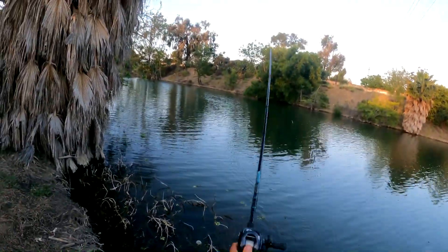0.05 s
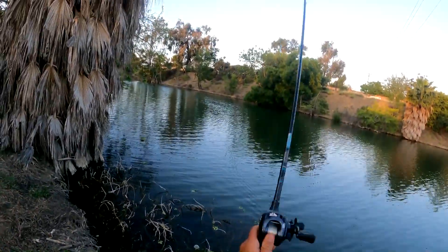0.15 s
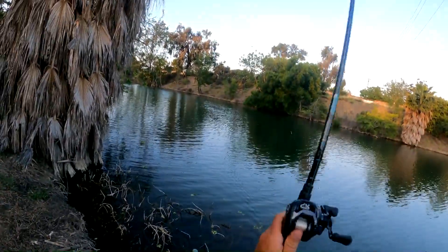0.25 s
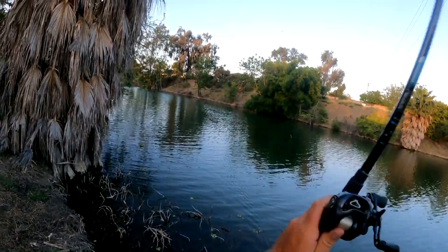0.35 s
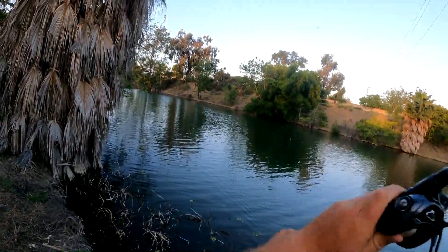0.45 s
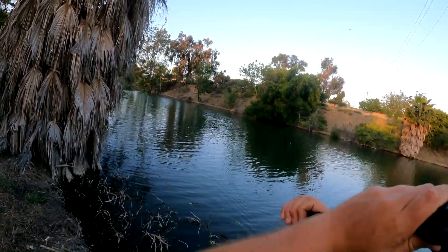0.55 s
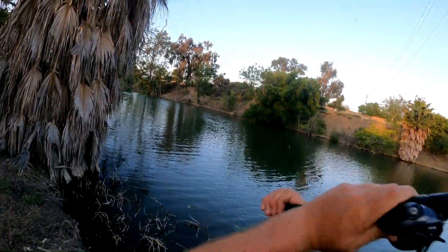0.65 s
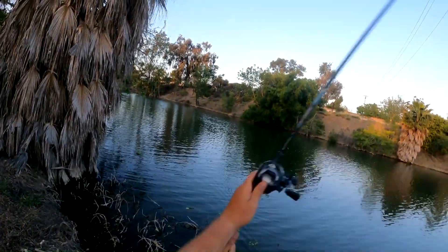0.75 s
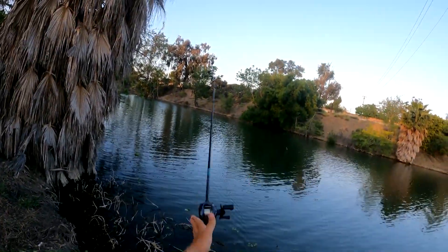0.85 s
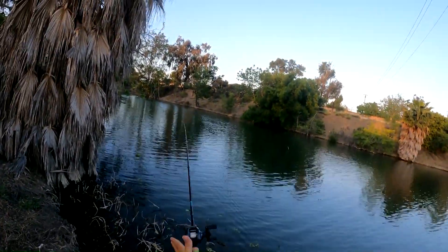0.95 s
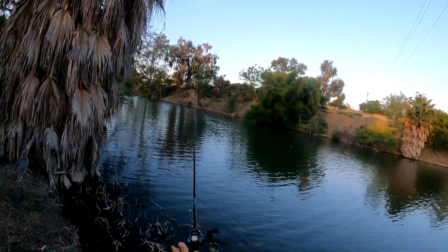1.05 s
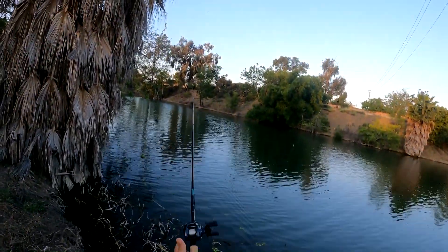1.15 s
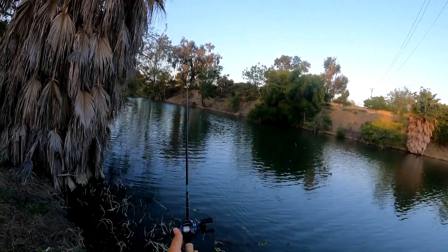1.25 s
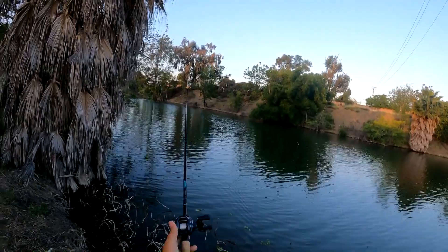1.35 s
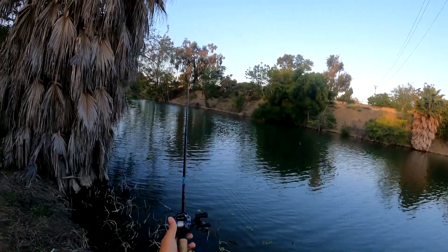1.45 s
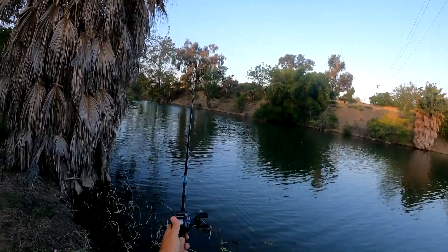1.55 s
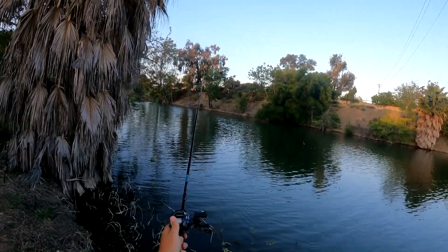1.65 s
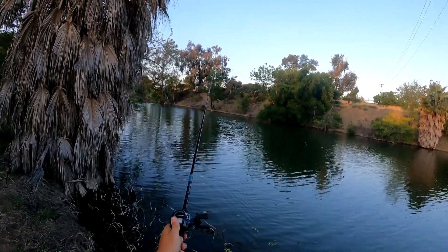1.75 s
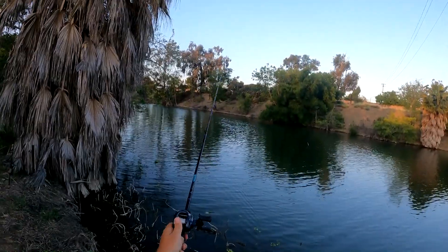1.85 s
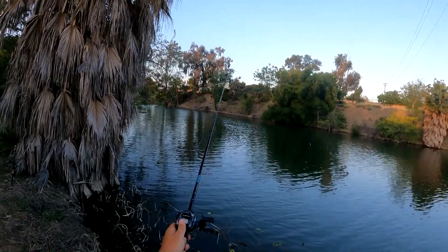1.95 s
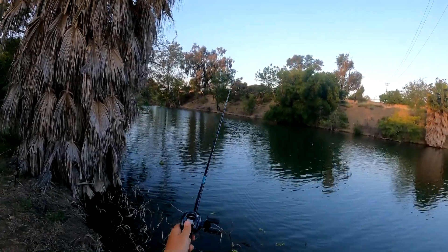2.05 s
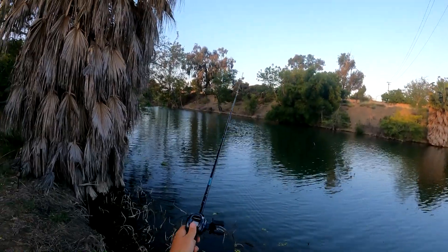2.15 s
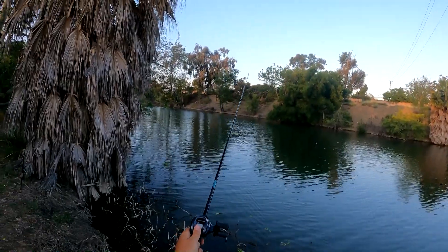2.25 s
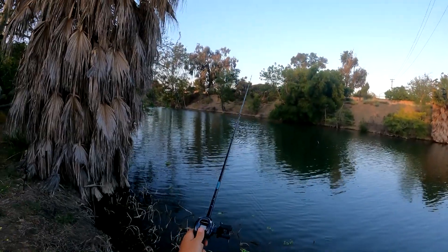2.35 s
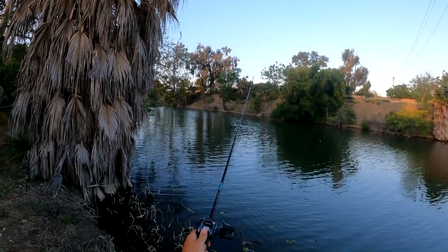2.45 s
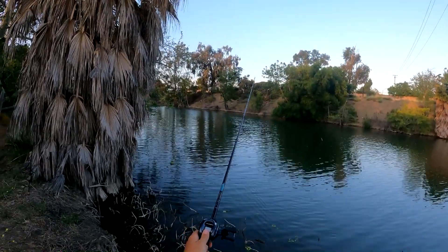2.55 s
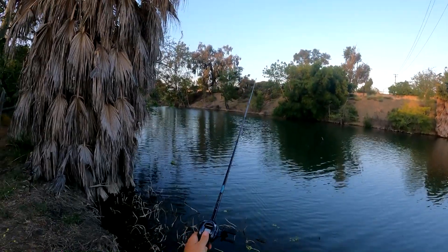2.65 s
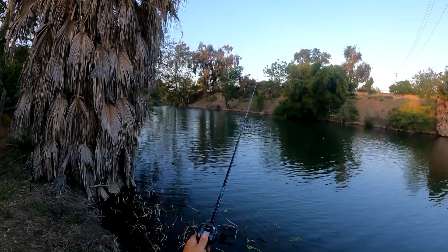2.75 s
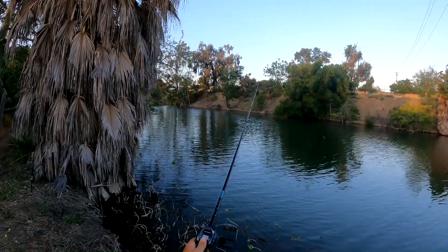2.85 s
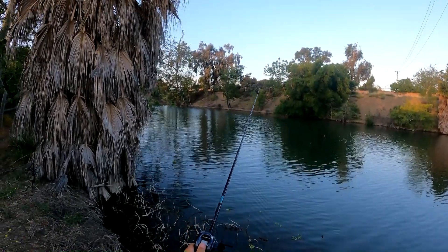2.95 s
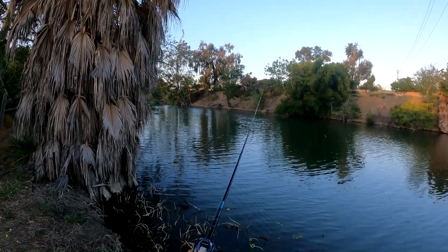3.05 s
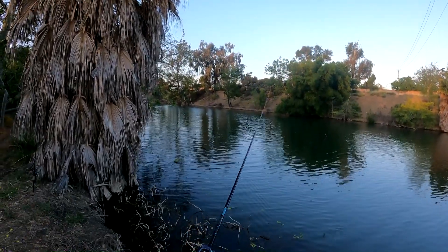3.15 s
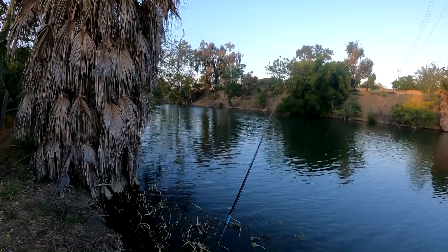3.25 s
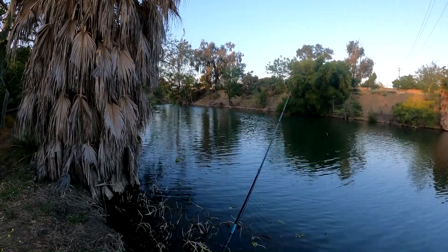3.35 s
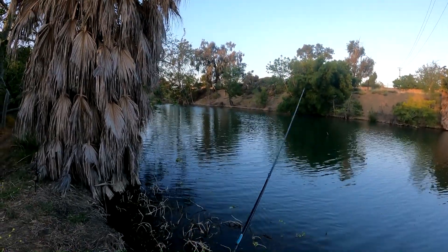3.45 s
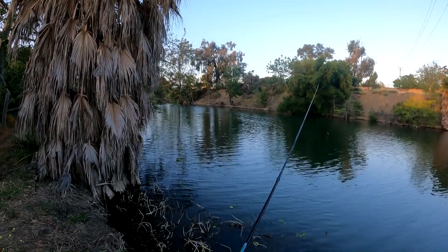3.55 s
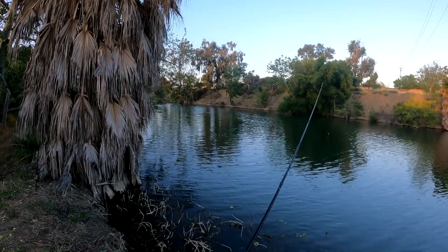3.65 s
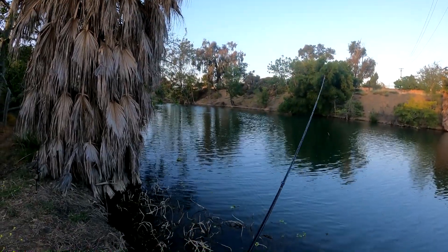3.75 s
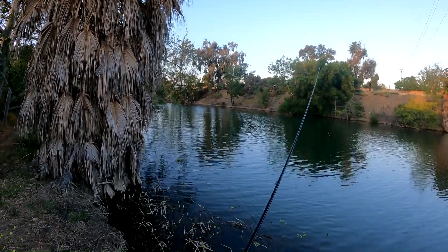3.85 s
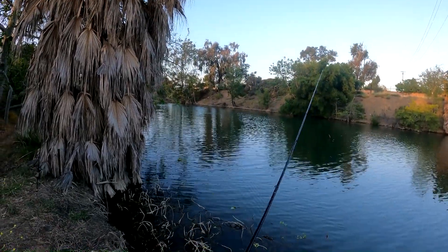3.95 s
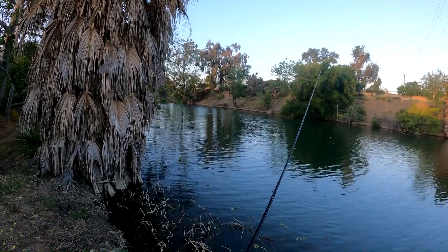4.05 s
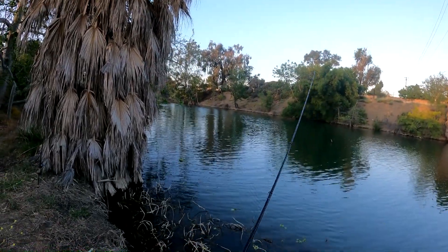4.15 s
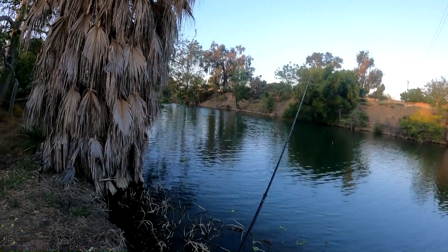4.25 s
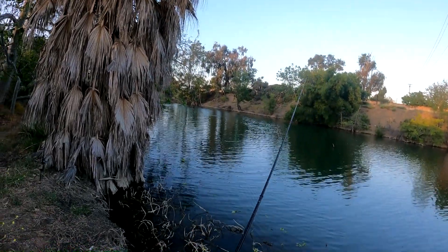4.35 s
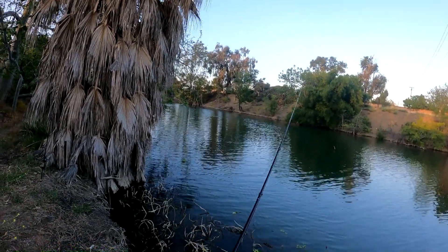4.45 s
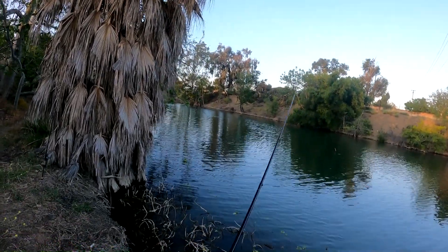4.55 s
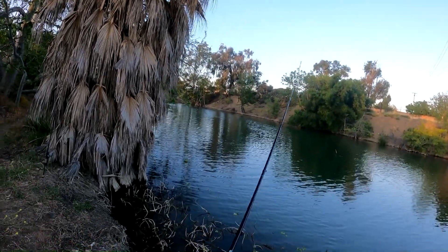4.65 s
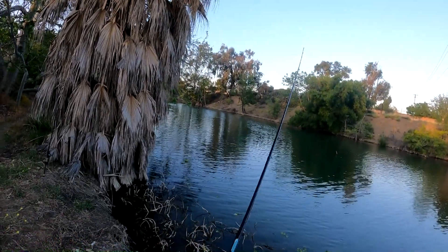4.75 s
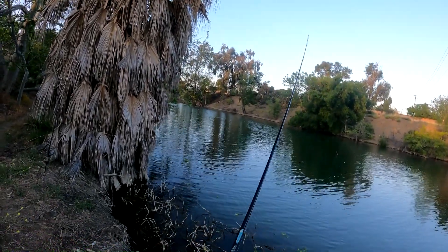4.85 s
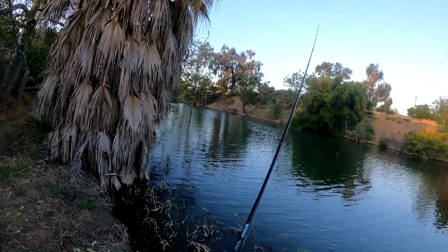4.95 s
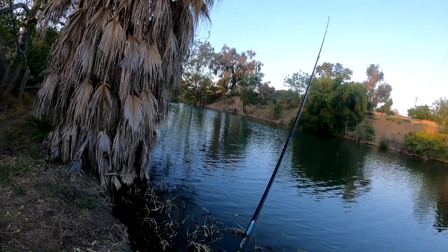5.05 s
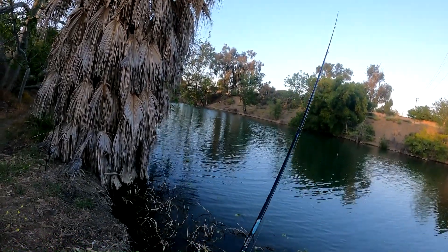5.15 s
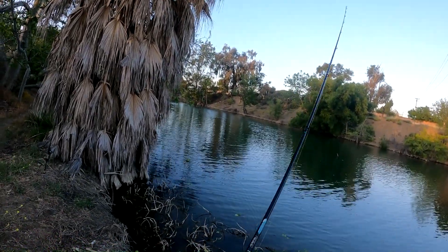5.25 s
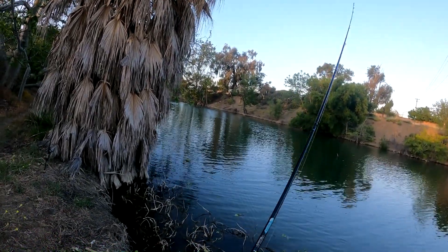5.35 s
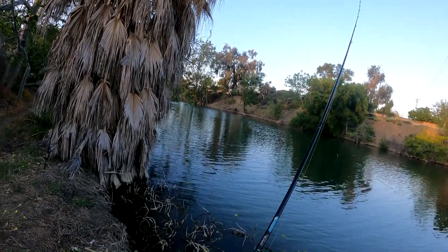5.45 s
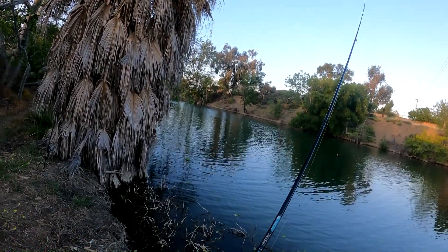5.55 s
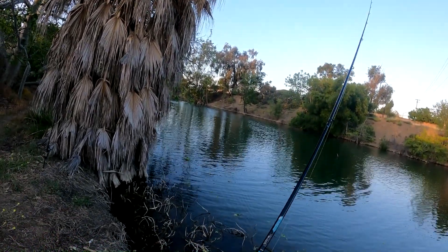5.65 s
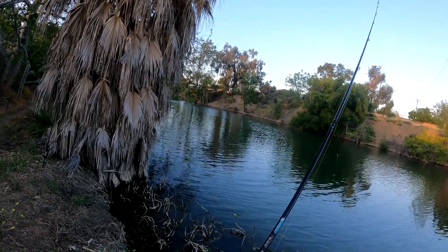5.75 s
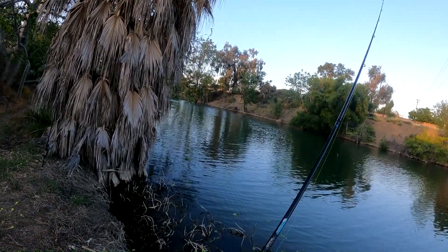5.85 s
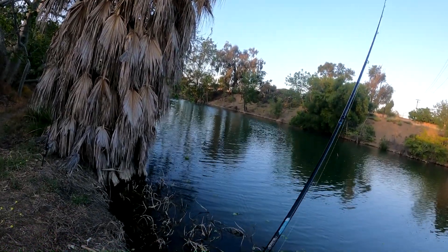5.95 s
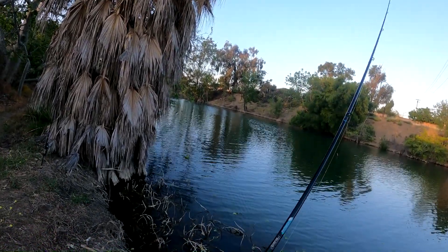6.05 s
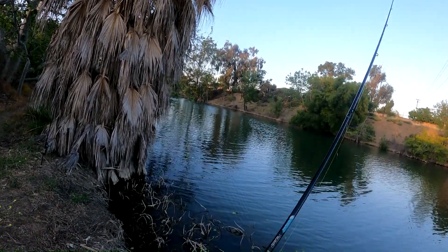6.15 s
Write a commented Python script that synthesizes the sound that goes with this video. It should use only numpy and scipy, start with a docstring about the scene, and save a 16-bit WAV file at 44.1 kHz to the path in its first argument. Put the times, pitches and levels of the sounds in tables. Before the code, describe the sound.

A fishing rod is cast with a swish and a falling reel whir, then one sharp click, over steady wind rumble and distant traffic.

```python
"""At a pond, over a steady rumble of wind and far traffic, a baitcasting rod is cast close by.
The rod swishes and knocks. The spool whirs down in pitch as line hisses through the guides,
then loose coils flutter against the reel until it stops. A turn of the handle snaps the reel
back into gear with one sharp click, and slack line is wound in with faint ticks."""
import sys
import numpy as np
from scipy import signal
from scipy.fft import rfft, irfft, next_fast_len
from scipy.io import wavfile

SR = 44100
rng = np.random.default_rng(int(sys.argv[2]) if len(sys.argv) > 2 else 0)


def file_out(sig):
    """Save sig as 16-bit WAV at sys.argv[1]."""
    # one column per channel
    cols = np.atleast_2d(sig).T
    # limit, then scale
    lim = np.clip(cols, -1, 1)
    pcm = np.round(lim * 32767).astype(np.int16)
    wavfile.write(sys.argv[1], SR, pcm)


N = 273023
TIME = np.arange(N) / SR
RELEASE_S, SLOWS_S, STOP_S = 0.8195, 1.715, 2.39  # the lure leaves, the lure slows, the spool stops

# Whir of the braked spool, sinking and faltering once:
# (time [s], pitch [Hz], fundamental trim [dB], overtone trim [dB], speed jitter [fraction])
WHIR_CURVE = [(.88, 1493, 1, -16, 0.03), (.98, 1442, -3.5, -8, .024), (1.07, 1344, 1, -6, .028),
              (1.15, 1279, 0, -2, 0.047), (1.24, 1285, -1, 2.5, 0.031), (1.285, 1246, 1, 1.5, .028),
              (1.32, 1160, -16, -1.5, 0.031), (1.37, 1106, 0, 1, 0.029), (1.53, 1070, -3.5, 1, .03),
              (1.6, 1026, -2.5, 1.5, .048), (1.69, 955, 0.5, -0.5, .045), (1.75, 931, -6, -4, .05)]
# Its harmonics, lowest first: (base level at release [dB], growth [dB/s], jitter scale [factor])
WHIR_PARTIALS = [(-42, -9, .85), (-46, 2, 1.1), (-59, 7, 1.1), (-52, 3, 1.05)]
# Side plate resonances that lift a passing partial: (centre [Hz], width [Hz], boost [dB])
SIDE_PLATE = [(2920, 400, 8), (4410, 1040, 9.5)]


def spool_whir(spin_up_s=.08, jitter_hz=330, rasp_depth=0.23, rasp_hz=380, waver_hz=35, plate_db=-45):
    """The spool's rough whir sinks until the lure slows; its top partial sets the side plate rasping."""
    pitch, fundamental_db, overtone_db, jitter = in_time(WHIR_CURVE)
    pitch = pitch * (1 + .009 * drift(waver_hz))
    flown_s = np.minimum(TIME, SLOWS_S) - RELEASE_S
    whir = 0
    for k, (db, growth, jitter_scale) in enumerate(WHIR_PARTIALS, 1):
        # coils peel off unevenly: the pitch jitters, smearing the high partials most, and the level rasps
        partial_hz = k * pitch * (1 + jitter_scale * jitter * drift(jitter_hz))
        phase = 2 * np.pi * np.cumsum(partial_hz) / SR
        tone = rms_one(np.sin(phase) * (1 + rasp_depth * drift(rasp_hz)))
        level_db = db + growth * flown_s + (fundamental_db if k == 1 else overtone_db)
        boost_db = sum(boost * nearness(k * pitch, hz, width) for hz, width, boost in SIDE_PLATE)
        waver_db = 1.8 * drift(waver_hz)
        whir += from_db(level_db + boost_db + waver_db) * tone
    plate_hz, plate_width, _ = SIDE_PLATE[-1]
    drive = nearness(len(WHIR_PARTIALS) * pitch, plate_hz, plate_width)
    plate = from_db(plate_db + overtone_db) * drive * narrow_tone(plate_hz, width_hz=420)
    return (whir + plate) * swell(RELEASE_S + spin_up_s, SLOWS_S, rise=600, fall=300)


# Hiss riding the pull of the line: (time [s], relative level [dB])
HISS_CURVE = [(.84, -35.5), (1.04, -38), (1.2, -35.5), (1.4, -38.5), (1.58, -38.5), (1.72, -43.5)]
# Colour of line on the guides: (frequency [Hz], relative level [dB])
HISS_SPECTRUM = [(500, -5), (800, -12.5), (1500, -3.5), (2800, 1.5), (3400, -3), (5200, 0.5), (6700, -4),
                 (8500, -5.5), (10300, -10), (12500, -15.5), (14200, -25), (15500, -41)]
# Reel frame resonances under the running line: (centre [Hz], width [Hz], strength [dB])
FRAME_RESONANCES = [(3900, 790, 0), (7520, 600, -6)]
# Two high rings over the hiss: (time [s], lower ring level [dB], upper ring level [dB])
RING_CURVE = [(.85, -44, -60), (1.08, -44, -58), (1.24, -45, -57), (1.36, -55, -55), (1.48, -51, -51),
              (1.56, -44, -57), (1.72, -56, -55)]
# Squeals in the guides: (time [s], length [s], pitch [Hz], level [dB])
LINE_SQUEALS = [(.9, .04, 4830, -46), (.98, 0.064, 3990, -41.5), (1.19, .04, 3810, -46)]


def running_line(hiss_trim_db=2):
    """Line rubs through the guides while the lure flies, ringing high and squealing briefly."""
    flight = swell(RELEASE_S, SLOWS_S, rise=400, fall=220)
    hiss_db = in_time(HISS_CURVE)[0] + hiss_trim_db
    hiss = from_db(hiss_db) * stereo_noise(HISS_SPECTRUM, FRAME_RESONANCES)
    lower_db, upper_db = in_time(RING_CURVE)
    rings = from_db(lower_db) * narrow_tone(7520, width_hz=430)
    rings += from_db(upper_db) * narrow_tone(10200, width_hz=900)
    squeals = sum(from_db(db) * bell(s, length) * narrow_tone(hz, width_hz=90)
                  for s, length, hz, db in LINE_SQUEALS)
    return flight * (hiss + rings) + squeals


# Colour of the rod's whoosh: (frequency [Hz], relative level [dB])
SWISH_SPECTRUM = [(200, -23), (550, 2.5), (900, -2), (1700, -1), (2300, -2), (3200, -11), (5000, -16),
                  (9000, -28.5), (15000, -35)]


def rod_swish(fastest_s=.828, whoosh_db=-32.5, whistle_hz=1950, whistle_db=-37, puff_db=-26):
    """The rod tears the air, whistling higher with its speed, and sends a low puff to the microphone."""
    speed = swell(fastest_s, fastest_s, rise=287, fall=211.5)
    whistle = from_db(whistle_db) * narrow_tone(whistle_hz * speed ** 0.2, width_hz=330)
    whoosh = from_db(whoosh_db) * stereo_noise(SWISH_SPECTRUM)
    puff = from_db(puff_db) * stereo_noise(WIND_SPECTRUM)
    return speed * (whoosh + whistle + puff)


# Hits in rod and reel; the loudest are the knock of the cast and the snap into gear:
# (time [s], attack level [dB], band centre [Hz], decay t60 [s])
TACKLE_HITS = [(.654, -57, 8000, 0.011), (0.6952, -50, 8000, 0.0091), (0.7015, -36, 1150, 0.0039),
               (0.728, -53, 6500, 0.011), (0.8192, -33.5, 3600, 0.009), (.8342, -20, 2700, .005),
               (3.0058, -43, 5200, 0.018), (3.013, -50, 3400, .04), (3.5003, -63, 5460, 0.011),
               (3.5357, -60, 6400, 0.018), (3.6944, -37, 3200, 0.02), (3.7005, -47, 5400, 0.028),
               (3.7215, -41, 2600, 0.017), (3.726, -38, 6000, 0.017), (3.73, -40, 9000, .008),
               (3.7342, -29.5, 3500, 0.012), (3.7373, -36.5, 3600, .04), (3.7454, -17.5, 4300, .018),
               (3.7521, -39, 2800, 0.048), (3.771, -48.5, 5200, .025), (3.7853, -41, 3800, 0.015),
               (3.891, -60, 7000, .012), (3.9146, -59, 8040, 0.013), (4.348, -51, 5200, 0.013),
               (5.068, -65, 8000, .01), (5.333, -66, 7500, 0.011)]
# Bright ring of the reel: (frequency [Hz], relative level [dB], t60 before hand damping [s])
REEL_MODES = [(2040, 6, 0.045), (2300, -0.5, .06), (2734, 2.5, .025), (3220, -5.5, 0.028), (3800, 1, 0.027),
              (4170, -3, .04), (5200, -1, 0.02), (5940, -4, .025), (6400, -5.5, .025), (6890, -1, .025),
              (7420, -9, 0.046), (9340, -9, .016)]
# Low modes of its body, ringing on under the hand: (frequency [Hz], relative level [dB], t60 [s])
BODY_MODES = [(1860, -21.5, 0.066), (1970, -17.5, 0.044), (2280, -14.5, .045), (2610, -22, .035)]


def knocks_and_clicks(chatter=0.39, crack=3.3, band_ratio=1.74, tail_db=-26, tail_t60=0.051):
    """Each contact cracks, chatters and rings the reel and its body; the bank returns a faint tail."""
    out = np.zeros((2, N))
    t = TIME[:SR // 6]
    attack = t < .003
    click_band = signal.butter(3, [1400, 10000], "band", fs=SR, output="sos")
    for s, level_db, centre_hz, t60 in TACKLE_HITS:
        ring = sum((-1) ** k * damped_sine(t, hz, db + rng.normal(0, 1), decay)
                   for k, (hz, db, decay) in enumerate(REEL_MODES))
        grit = rng.standard_normal(len(t)) + 0.62 * rng.standard_normal((2, len(t)))  # centre + sides
        hand_damping = from_db(-60 * t / t60)
        tail = from_db(tail_db - 60 * t / tail_t60) * rng.standard_normal((2, len(t)))
        hit = (ring / np.abs(ring).max() + chatter * grit) * hand_damping + crack * (t == 0) + tail
        # harder, smaller parts sound higher; a band-pass trims the bass and the very top of every click
        hit = band(hit, centre_hz / band_ratio, centre_hz * band_ratio)
        hit = signal.sosfilt(click_band, hit)
        body = sum(damped_sine(t, hz, db, decay) for hz, db, decay in BODY_MODES)
        start = round(s * SR)
        out[:, start:start + len(t)] += from_db(level_db) * (hit / hit[:, attack].std() + body)
    return out


# Accented flaps of loose line: (time [s], relative peak level [dB])
LINE_FLAPS = [(1.836, -36), (1.8915, -49), (1.9444, -41), (1.9825, -54), (2.0532, -43), (2.1211, -51),
              (2.174, -43), (2.2485, -46), (2.2832, -44), (2.3315, -46), (2.4025, -39.5), (2.432, -39.5),
              (2.4553, -42)]
# Colour of line brushing the frame: (frequency [Hz], relative level [dB])
BRUSH_SPECTRUM = [(1500, 12), (3500, 0.5), (5000, -5.5), (6100, 2), (7400, -7), (9000, -8), (12000, -23),
                  (15500, -38)]
# Ringing peaks in that brush: (centre [Hz], width [Hz], strength [dB])
BRUSH_RESONANCES = [(4200, 350, 5.5), (5900, 400, -3), (7450, 500, 9)]


def line_flutter(start_s=1.76, turns_per_s=110, run_down_s=.75, brush_db=-45.5, sag_db_per_s=9,
                 flap_trim_db=-9, flap_rise_s=0.00081, flap_t60=0.043):
    """Loose line brushes the frame about once a turn; as the spool slows, single flaps stand out."""
    coasted_s = np.clip(TIME, start_s, STOP_S) - start_s
    turn_rate = turns_per_s * np.exp(-coasted_s / run_down_s + .3 * drift(45))
    turns = np.cumsum(turn_rate) / SR
    pulse_db = 4.5 * np.cos(2 * np.pi * turns) + 1.5 * drift(60)
    level = from_db(brush_db - sag_db_per_s * coasted_s) * swell(start_s, STOP_S, rise=220, fall=450)
    touch = level * rms_one(from_db(pulse_db))
    t = TIME[:SR // 20]
    flap = (1 - np.exp(-t / flap_rise_s)) * from_db(-60 * t / flap_t60)
    for s, peak_db in LINE_FLAPS:
        start = round(s * SR)
        touch[start:start + len(t)] += from_db(peak_db + flap_trim_db) * flap / flap.max()
    return touch * stereo_noise(BRUSH_SPECTRUM, BRUSH_RESONANCES)


# Colour of line on the coasting spool: (frequency [Hz], relative level [dB])
RUSTLE_SPECTRUM = [(1200, -23), (2000, 4), (3500, -1), (5200, -0.5), (7000, -10), (9500, -8.5),
                   (12500, -21), (15500, -34)]


def coasting_rustle(level_db=-43, grain_db=3, ring_width_hz=450, ring_db=5):
    """Line rustles on the coasting spool and keeps the side plate faintly ringing."""
    level = from_db(level_db + grain_db * drift(133)) * swell(SLOWS_S, SLOWS_S, rise=120, fall=44)
    stop = swell(0, STOP_S, rise=0, fall=300)
    plate_hz = SIDE_PLATE[-1][0]
    return level * stop * stereo_noise(RUSTLE_SPECTRUM, [(plate_hz, ring_width_hz, ring_db)])


# Shifts of the hand on the grip: (time [s], length [s], level [dB])
GRIP_SHIFTS = [(.37, 0.41, -61.5), (0.755, 0.1, -52), (2.7, 0.35, -73.5), (3.05, 0.084, -65),
               (3.57, 0.098, -66), (3.755, 0.059, -50), (3.89, 0.029, -57), (4.3, 0.081, -70)]
# Colour of sleeve and skin rubbing: (frequency [Hz], relative level [dB])
SLEEVE_SPECTRUM = [(1500, 0.5), (3500, 6.5), (6500, -0.5), (9000, -5.5), (12000, -14.5), (15500, -26)]


def grip_rubs(grain_db=2.5, resting_db=-84):
    """Sleeve and hand rub faintly on the grip, each shift a soft, grainy stroke."""
    strokes = sum(from_db(db) * bell(s, length) for s, length, db in GRIP_SHIFTS)
    grain = from_db(grain_db * drift(120))
    return (strokes + from_db(resting_db)) * grain * stereo_noise(SLEEVE_SPECTRUM)


def winding_in(start_s=4.85, end_s=5.3, ticks_per_s=22, tick_db=-59, tick_t60=.012, rub_db=-85):
    """Slack line slides back through the guides with faint, high, random ticks."""
    impulses = (rng.random(N) < ticks_per_s / SR) * rng.random(N)
    decay_per_sample = from_db(-60 / (tick_t60 * SR))
    ticks = signal.lfilter([1], [1, -decay_per_sample], impulses + 1e-18)
    level = (from_db(tick_db) * ticks + from_db(rub_db)) * swell(start_s, end_s, rise=25, fall=25)
    return level * rms_one(band(stereo_noise(HISS_SPECTRUM), 5800, 10000))


# Colour of buffeting air: (frequency [Hz], relative level [dB])
WIND_SPECTRUM = [(15, -18), (30, -2), (45, 3), (65, 3), (90, -0.5), (125, -5), (165, -8), (200, -12),
                 (260, -15), (350, -21.5), (600, -35.5), (1200, -83)]


def wind(level_db=-29.5, growth_db_per_s=0.15):
    """Wind lays down a low rumble, slowly freshening."""
    return from_db(level_db + growth_db_per_s * TIME) * stereo_noise(WIND_SPECTRUM)


# Rise and fall of the airy bed: (time [s], level [dB])
AIR_CURVE = [(0, -45.5), (1.5, -48), (3.5, -44), (6.19, -44.5)]
# Its colour: (frequency [Hz], relative level [dB])
AIR_SPECTRUM = [(200, -16), (330, -1.5), (520, -2), (700, -6), (850, -6.5), (1000, -4), (1350, -8),
                (1800, -8.5), (2800, -19.5), (3700, -23.5), (5000, -28.5), (7000, -35), (10000, -54),
                (15000, -83.5)]
# A faint high ring in it: (centre [Hz], width [Hz], strength [dB])
AIR_RESONANCE = [(3690, 97, 3.4)]


def air_wash():
    """A soft wash of air comes from the trees and the distance."""
    return from_db(in_time(AIR_CURVE)[0]) * stereo_noise(AIR_SPECTRUM, AIR_RESONANCE)


# Colour of the far road: (frequency [Hz], relative level [dB])
ROAD_SPECTRUM = [(250, -15), (420, -6), (520, 1), (720, 0.5), (880, -11.5), (1200, -16), (2500, -36)]
# Its hum: (centre [Hz], width [Hz], strength [dB])
ROAD_HUM = [(510, 13, -7)]
# Singing tyres, gliding down: (time [s], pitch [Hz], level [dB])
TYRE_CURVE = [(4.3, 790, -70), (5.0, 770, -58), (5.4, 749, -51.5), (5.7, 726.5, -48), (5.9, 652.6, -50.5),
              (6.19, 615, -62)]


def far_traffic(nearest_s=5.6, pass_db=-45.5, road_db=-60.5):
    """Traffic swells out of a steady road wash, its engine tones and singing tyres falling in pitch."""
    passing = from_db(pass_db) * swell(nearest_s, nearest_s, rise=7, fall=6)
    road = np.hypot(passing, from_db(road_db)) * stereo_noise(ROAD_SPECTRUM, ROAD_HUM)
    pitch_sag = 1 - .04 * (TIME - nearest_s)
    engine = from_db(-10) * narrow_tone(409 * pitch_sag, width_hz=9.9)
    engine += from_db(-13) * narrow_tone(808 * pitch_sag, width_hz=8)
    tyre_hz, tyre_db = in_time(TYRE_CURVE)
    tyres = from_db(tyre_db) * narrow_tone(tyre_hz, width_hz=60)
    return road + passing * engine + tyres


# Tones of a far engine: (pitch [Hz], width [Hz], base level at mid-scene [dB], growth [dB/s])
DRONE_TONES = [(54.57, 8.3, -43, 1.5), (80.8, 5.1, -41, -0.5), (110.7, 11.3, -43, -1),
               (134.3, 11.2, -45.5, -0.5), (228.7, 10, -51.5, 1.5), (308.2, 2.9, -53, -1),
               (395.3, 11, -62, 2), (420, 8.6, -58.5, 0.5)]
# Swell over all of them: (time [s], trim [dB])
DRONE_CURVE = [(0, -3), (2, -3.5), (2.8, 2.5), (6.19, 2)]


def engine_drone():
    """A far engine drones in low, wavering tones that swell together."""
    from_middle_s = TIME - TIME.mean()
    tones = sum(from_db(db + growth * from_middle_s) * narrow_tone(hz, width)
                for hz, width, db, growth in DRONE_TONES)
    return from_db(in_time(DRONE_CURVE)[0]) * tones


# Stereo width of the noise layers: (frequency [Hz], side against mid [dB])
STEREO_WIDTH = [(60, -33.5), (125, -36), (250, -21.5), (500, -13.5), (1000, -13.5), (2000, -11), (8000, -9),
                (15000, -6)]


def stereo_noise(spectrum, resonances=()):
    """Coloured noise of rms 1, centred in the bass and wider in the treble."""
    size = next_fast_len(N)
    hz = np.fft.rfftfreq(size, 1 / SR)
    peaks = sum((from_db(db) * nearness(hz, centre, width)) ** 2 for centre, width, db in resonances)
    roll_off = np.minimum(1, hz / spectrum[0][0]) ** 2 / np.maximum(1, hz / spectrum[-1][0]) ** 2
    colour = gain_at(spectrum, hz) * np.sqrt(1 + peaks) * roll_off
    mid, side = rfft(rng.standard_normal((2, size))) * colour
    side = side * gain_at(STEREO_WIDTH, hz)
    return rms_one(irfft(np.array([mid + side, mid - side]), size)[:, :N])


def narrow_tone(hz, width_hz):
    """A tone whose level and phase wander, smearing it over a narrow band."""
    phase = 2 * np.pi * np.cumsum(hz * np.ones(N)) / SR
    return rms_one(drift(width_hz) * np.cos(phase) + drift(width_hz) * np.sin(phase))


def damped_sine(t, hz, db, t60):
    """One struck mode ringing out."""
    return from_db(db - 60 * t / t60) * np.sin(2 * np.pi * hz * t)


def drift(rate_hz):
    """Smooth random modulation of rms 1."""
    size = next_fast_len(N)
    hz = np.fft.rfftfreq(size, 1 / SR)
    smoothed = rfft(rng.standard_normal(size)) / (1 + (hz / rate_hz) ** 2) ** 2
    return rms_one(irfft(smoothed, size)[:N])


def swell(start_s, end_s, rise, fall):
    """Envelope that holds 1 from start to end; rise and fall are its slopes in dB/s."""
    return from_db(-rise * np.maximum(start_s - TIME, 0) - fall * np.maximum(TIME - end_s, 0)) + 1e-12


def bell(middle_s, length_s):
    """A soft bell-shaped envelope."""
    return np.exp(-2 * ((TIME - middle_s) / length_s) ** 2)


def nearness(hz, centre_hz, width_hz):
    """1 on a resonance, falling away on both sides."""
    return 1 / (1 + (2 * (hz - centre_hz) / width_hz) ** 2)


def band(x, low_hz, high_hz):
    """Gentle band-pass."""
    sos = signal.butter(2, [low_hz, min(high_hz, SR / 2 - 1000)], "band", fs=SR, output="sos")
    return signal.sosfilt(sos, x)


def in_time(rows):
    """Each column of an automation curve, at every sample."""
    times, *columns = np.transpose(rows)
    return [np.interp(TIME, times, column) for column in columns]


def gain_at(spectrum, hz):
    """Gain of an EQ curve, joined on a log-frequency axis."""
    knots, db = np.transpose(spectrum)
    return from_db(np.interp(np.log(hz + 1), np.log(knots), db))


def from_db(db):
    """Decibels to gain."""
    return 10 ** (np.asarray(db) / 20)


def rms_one(x):
    """Scale to unit rms."""
    return x / np.sqrt(np.mean(x ** 2) + 1e-20)


# How far the left channel trails the right: (frequency [Hz], phase lag [rad])
LEFT_LAG = [(0, 0.049), (520, 0.22), (3000, 0.66), (6000, 0.23), (10000, 0.45), (16000, 0.041)]


def lag_left(left, margin=SR // 10):
    """Set the left channel slightly behind in phase."""
    padded = np.pad(left, margin, mode="reflect", reflect_type="odd")
    size = next_fast_len(len(padded))
    lag = np.interp(np.fft.rfftfreq(size, 1 / SR), *np.transpose(LEFT_LAG))
    return irfft(rfft(padded, size) * np.exp(-1j * lag), size)[margin:margin + N]


def scene():
    """Close tackle over the outdoor bed; the tackle, wind and drone lean slightly left."""
    cast = rod_swish() + running_line() + spool_whir() + coasting_rustle() + line_flutter()
    tackle = cast + knocks_and_clicks() + grip_rubs() + winding_in()
    tackle_pan, low_pan = from_db([[.5], [-.5]]), from_db([[.3], [-.3]])
    bed = low_pan * wind() + air_wash() + far_traffic() + low_pan * engine_drone()
    left, right = tackle_pan * tackle + bed
    return np.array([lag_left(left), right])


def record(dry):
    """A steep low-pass takes off the top above 15.7 kHz."""
    return signal.sosfilt(signal.ellip(10, .1, 80, 15700, fs=SR, output="sos"), dry)


dry = scene()
out = record(dry)
file_out(out)
```